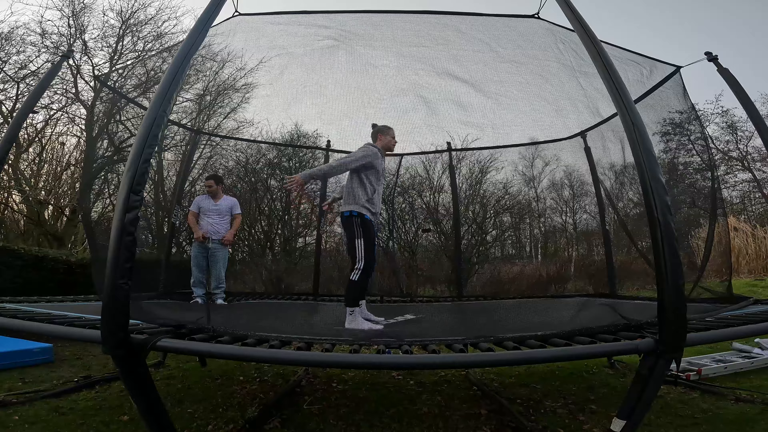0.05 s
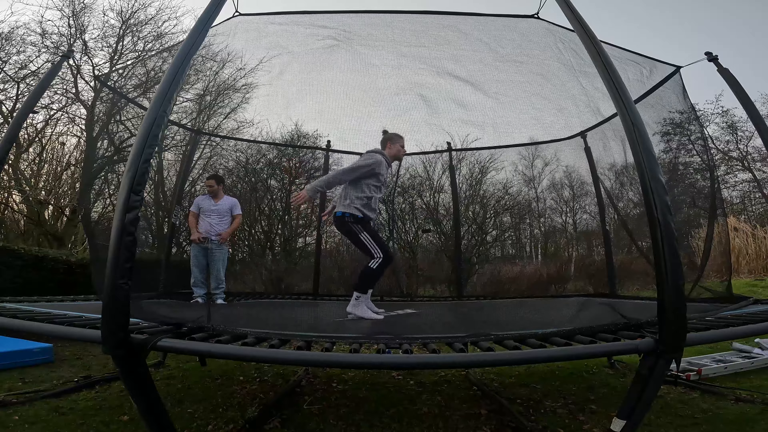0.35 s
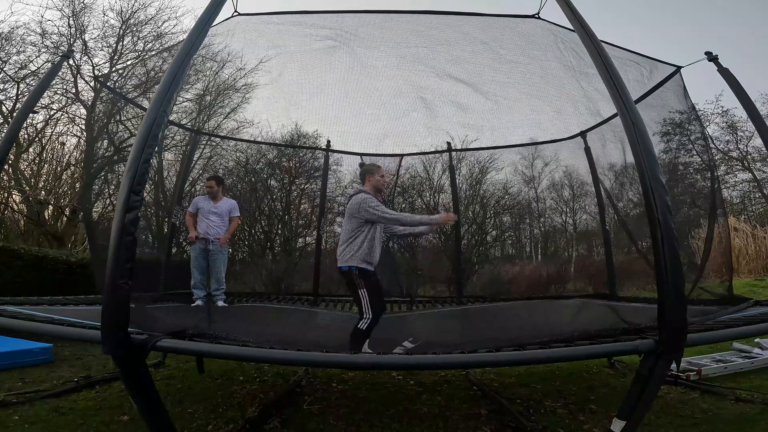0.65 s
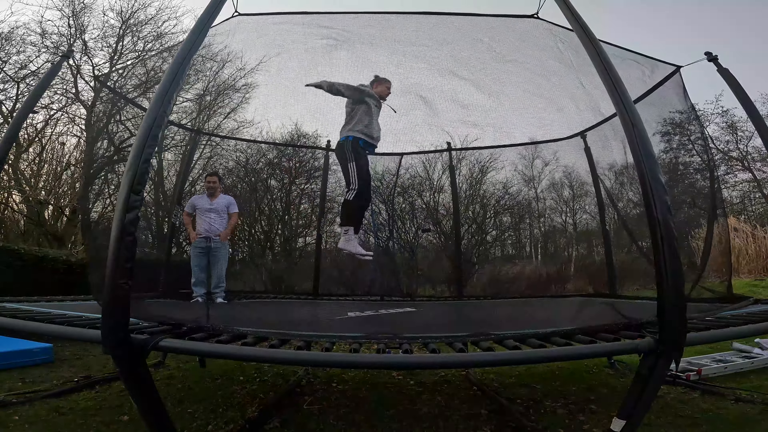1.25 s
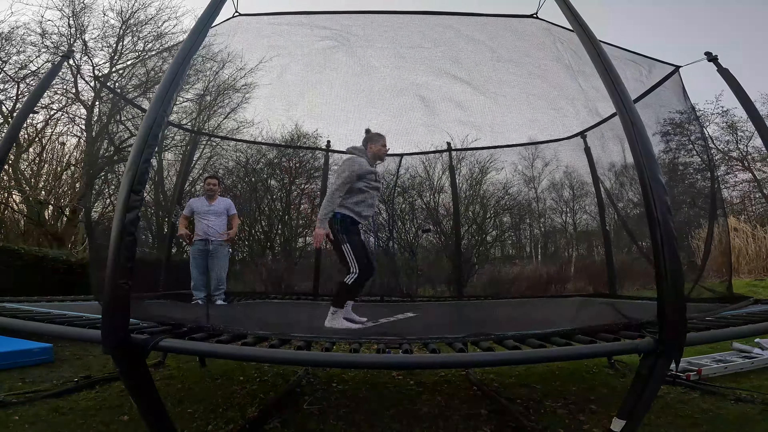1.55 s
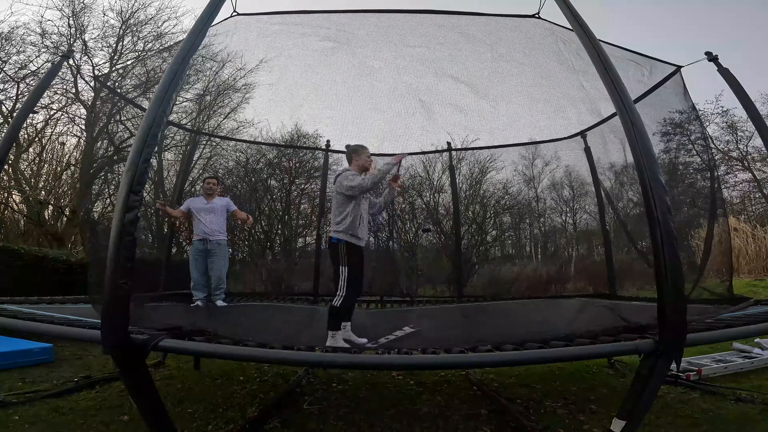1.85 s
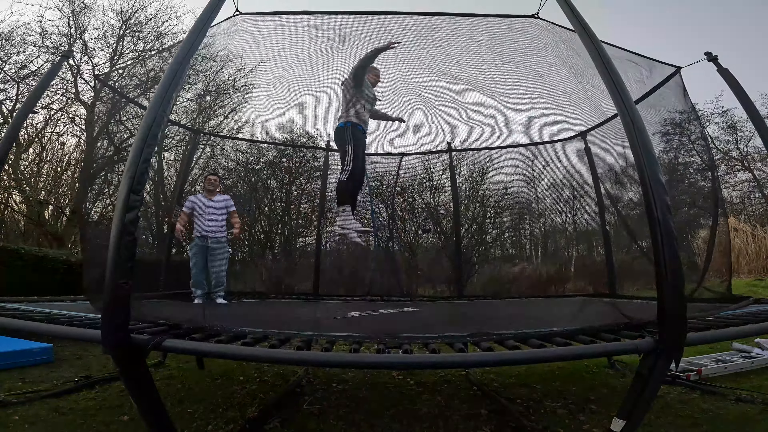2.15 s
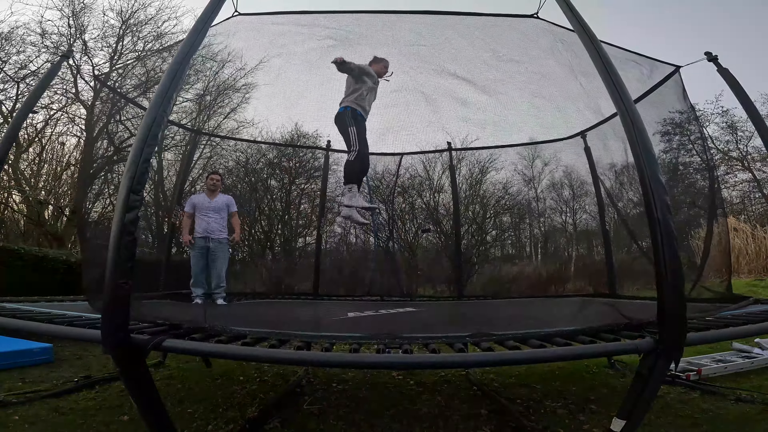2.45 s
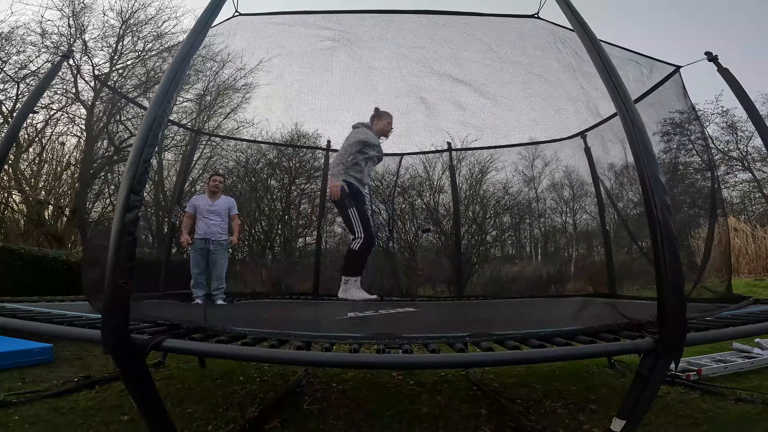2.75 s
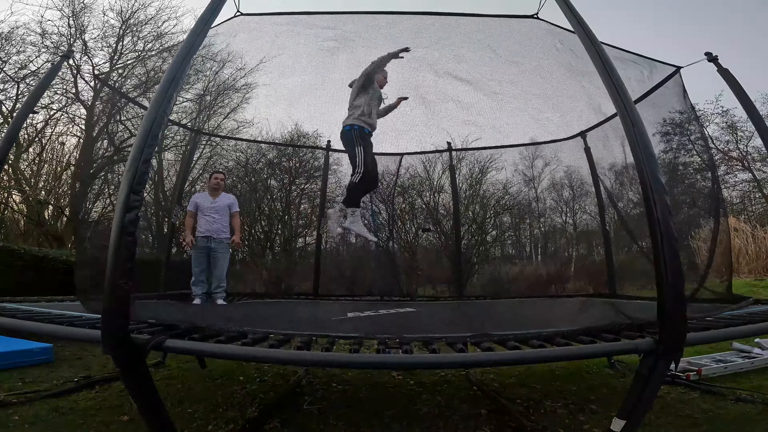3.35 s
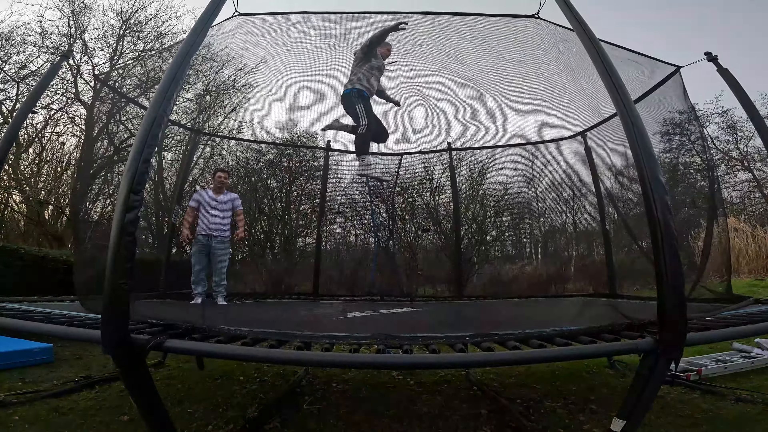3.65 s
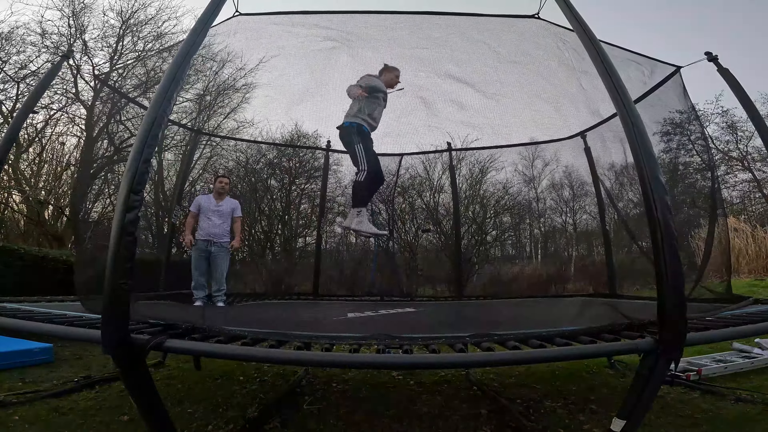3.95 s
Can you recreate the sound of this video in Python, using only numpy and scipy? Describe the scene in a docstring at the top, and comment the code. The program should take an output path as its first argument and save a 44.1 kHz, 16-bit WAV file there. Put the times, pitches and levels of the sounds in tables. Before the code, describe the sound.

Someone bounces three times on a garden trampoline close by. The mat rustles and hooks creak, then the springs rattle and clack against the ringing steel frame. The last two bounces begin with low thumps, over light wind.

```python
"""Light wind, a far outdoor hum and a faintly singing coil; then someone bounces three times on a
garden trampoline, close by. The mat rustles and the hooks creak as it stretches, the slack springs
rattle as it comes back up, and the empty mat snaps them against the ringing steel frame.
The second and third bounces each open with a landing that pushes out a thump of air."""
import sys
import numpy as np
from scipy import signal
from scipy.fft import rfft, irfft
from scipy.io import wavfile
from scipy.ndimage import uniform_filter1d

SR = 44100
rng = np.random.default_rng(int(sys.argv[2]) if len(sys.argv) > 2 else 0)


def dump_mix(stems):
    """Bounce the given channels to the path in sys.argv[1] as a 16-bit WAV at rate SR."""
    frames = np.atleast_2d(stems).T  # one column per channel
    limited = np.clip(frames, -1, 1)  # hard clip at full scale
    pcm = np.round(limited * 32767).astype(np.int16)
    wavfile.write(sys.argv[1], SR, pcm)


N = 176400
T = np.arange(N) / SR
RING_T = T[:SR]

# left-right likeness of noise: freq_hz, correlation
STEREO_CORRELATION = [(30, 0.98), (130, 1), (280, 0.79), (1000, 0.8), (4000, 0.76), (8000, 0.92),
                      (13000, 0.52)]
# wind and far hum: freq_hz, level_db
AIR_SPECTRUM = [(20, 5), (43, 2.5), (75, -9.5), (118, -18), (169, -15), (256, -26.5), (330, -30.5),
                (385, -22.5), (484, -28), (650, -30), (1000, -27), (1350, -24), (1800, -32.5), (2400, -48),
                (4000, -53.5), (7000, -56), (9500, -56), (15000, -71.5)]
# wind and far hum: time_s, level_db
AIR_LEVEL = [(0, -46), (1.5, -46), (2.6, -47.5), (4, -48.5)]
# low flutter of mat and wind: freq_hz, level_db
FLUTTER_SPECTRUM = [(40, 6), (70, -0.5), (110, -2.5), (160, -4), (230, -9.5), (320, -21.5), (600, -26),
                    (2000, -70)]
# low flutter of mat and wind: time_s, level_db
FLUTTER_LEVEL = [(0, -65), (.3, -52.5), (.5, -56), (.95, -61), (1.05, -42.5), (1.2, -91), (1.6, -66),
                 (1.75, -66), (1.9, -42), (2.04, -47), (2.12, -45.5), (2.22, -51), (2.5, -66), (2.9, -68),
                 (3.0, -49), (3.17, -39.5), (3.28, -45), (3.37, -44.5), (3.5, -54), (3.7, -58), (4, -72)]
# single coils singing: start_s, hold_s, pitch_hz, level_db
COIL_NOTES = [(0.01, 0.084, 787, -60), (1.305, 0.046, 2058, -64), (1.425, 0.066, 3100, -77)]

# friction of stretching mat and springs: time_s, level_db
HISS_LEVEL = [(0, -73), (.45, -76.5), (.6, -67), (.67, -57.5), (.8, -61), (.86, -61.5), (.95, -66.5),
              (1.3, -72), (1.66, -78), (1.74, -66), (1.93, -66), (1.98, -58.5), (2.06, -61), (2.4, -72.5),
              (2.9, -81.5), (2.95, -70.5), (3.05, -62), (3.11, -51), (3.128, -49.5), (3.17, -51),
              (3.23, -52), (3.32, -55), (3.5, -63.5), (4, -79)]
# friction grain: freq_hz, level_db
HISS_SPECTRUM = [(1200, -1.5), (2200, 2.5), (3800, -6), (5000, -2.5), (6000, -3.5), (7500, -6.5),
                 (9000, -16), (12000, -13.5), (13200, -24), (15000, -45)]
# taut coil slides in its hook: start_s, level_db
SWISHES = [(1.965, -61), (3.128, -44.5)]
# sliding coil: freq_hz, level_db
SWISH_SPECTRUM = [(3000, -18), (4400, -13), (5200, 1.5), (6100, -4.5), (7000, -10), (8000, -14.5),
                  (11000, -24), (15000, -50)]

# hooks and straps under load: start_s, hold_s, level_db, treble_db
CREAKS = [(.685, 0.0067, -53, 9), (.70, 0.017, -58.5, -19), (.85, 0.0034, -64, 14),
          (1.785, 0.0079, -54.5, -9), (1.821, 0.017, -47.5, -13), (1.862, 0.031, -54.5, -4),
          (1.934, .003, -49.5, -8), (1.958, 0.0068, -53.5, 1), (1.986, 0.0024, -47, -6),
          (3.119, 0.015, -56.5, 9), (3.134, 0.02, -47.5, -20), (3.2, 0.0052, -45.5, -6),
          (3.245, 0.0063, -42, 7.5), (3.288, 0.0088, -63, -5), (3.335, 0.013, -47, -12)]
# creaks and foot scuffs: freq_hz, level_db
RUB_SPECTRUM = [(250, -2), (500, -2), (750, -14.5), (1050, 4), (2200, -3), (4000, -13), (7500, -19),
                (9000, -20.5), (12000, -25.5), (15000, -58)]
# hook slips in its eye: start_s, level_db
PINGS = [(1.986, -57.5), (3.0703, -38.5), (3.122, -46.5)]
# slip noise: freq_hz, level_db
SLIP_SPECTRUM = [(1000, -22.5), (2000, -6), (2600, -6.5), (3400, -12), (5300, -16), (5700, -2.5),
                 (7000, -5.5), (7800, -17), (9800, -24), (11200, -18), (13000, -28), (15000, -46)]
# ringing hook: freq_hz, level_db, t60_s
HOOK_MODES = [(2514, -14, .16), (2697, -9, .12), (5674, 0, .09), (5900, -2, .09), (6385, -6, .1),
              (10980, -21, .11), (11500, -22, .1), (12910, -25, .1)]

# springs go slack: start_s, hold_s, level_db, treble_db
RATTLES = [(.737, .03, -41.5, -2), (.945, 0.072, -50.5, -47), (1.018, 0.058, -39, -6),
           (2.022, 0.031, -40.5, -31), (2.091, 0.053, -37, -4), (3.362, 0.019, -38, 2),
           (3.388, 0.023, -37, -10)]
# springs snap tight: start_s, level_db, treble_db
CLACKS = [(1.181, -37, 6), (2.26, -36, 5.5), (2.3293, -37, 7.5), (2.728, -61.5, 4), (3.501, -36.5, 6),
          (3.555, -48.5, -3), (3.584, -36, 6.5), (3.727, -53.5, -17)]
# dry steel contact: freq_hz, level_db
CONTACT_SPECTRUM = [(200, -24), (420, -2), (700, -7), (1100, -2), (2200, 6), (3200, -5), (3600, -4.5),
                    (4300, -7), (6000, -7.5), (7800, -9.5), (8500, -20.5), (12000, -25), (13200, -45),
                    (15000, -76)]
# frame and spring resonances: freq_hz, bandwidth_hz, level_db
FRAME_MODES = [(640, 40, -7), (788, 24, -3), (965, 30, 3), (1040, 40, -4), (1260, 28, 1), (1345, 40, -3),
               (1445, 40, -4), (1589, 40, -2), (1822, 40, -2), (1900, 36, 4), (2102, 26, 0), (2230, 24, 3),
               (2348, 26, 1), (2488, 40, -2), (2710, 40, -4), (2797, 30, -4), (2915, 28, 3), (3189, 18, 3),
               (3755, 55, -7), (4016, 35, -8), (4460, 40, -14), (4730, 70, -13), (5260, 110, -14),
               (5980, 100, -9), (6400, 90, -15), (6950, 70, -14), (7850, 110, -13)]
# dense ring of the coils: freq_hz, level_db
COIL_SPECTRUM = [(700, 1.5), (1300, -1), (2200, 4.5), (3200, 1.5), (3500, -11), (4600, -13.5), (5600, -2),
                 (7400, -8), (8500, -29), (12000, -23.5), (15000, -60)]
# long single coil modes: freq_hz, level_db, t60_s
COIL_MODES = [(788, -7, .8), (1335, -7, .4), (2090, -6, .45), (2347, -2, .25), (2895, -4, .36),
              (2922, -4, .36), (3172, -5, .36), (3193, -3, .38), (4020, -9, .17)]
# flapping mat edge: freq_hz, level_db
EDGE_SPECTRUM = [(150, -2.5), (330, -17.5), (480, -5.5), (650, -6), (980, 5), (1400, 1), (2000, -3.5),
                 (3500, -24), (8000, -49)]

# mat swings through level: centre_s, level_db, width_s
SWINGS = [(1.05, -31.5, .011), (1.745, -32.5, .005), (2.12, -27.5, 0.0099), (3.002, -28, 0.0077),
          (3.364, -23, 0.0085)]
# feet first touch the mat: start_s, level_db
SCUFFS = [(1.678, -52.5), (2.93, -50.5)]
# feet land: centre_s, level_db, pulse_width_s, slap_db
LANDINGS = [(1.687, -14.5, 0.002, -45), (2.9407, -12, 0.0038, -40)]
# boom of the struck mat: freq_hz, level_db, t60_s
MAT_MODES = [(53, -20, 0.21), (132.6, -10.5, .045), (225.7, -18, 0.081)]
# slap of the feet: freq_hz, level_db
SLAP_SPECTRUM = [(100, -5), (230, 2), (330, -4), (480, -1), (750, -16), (1300, -8.5), (2500, -32),
                 (7000, -42), (14000, -57)]
# shudder after a landing: freq_hz, level_db
SHUDDER_SPECTRUM = [(20, 13.5), (55, 3.5), (90, -10), (135, -10), (190, -12.5), (300, -59), (900, -80)]

TREBLE_HZ, TREBLE_PAN_DB, MODE_SPREAD_RAD = 3430, 1.05, 0.2
GRAINS_PER_S, GRAIN_T60_S = 4300, 0.02
HOOK_RING_DB = -1.5
TAKE_UP_S, TAKE_UP_DB, TAKE_UP_TREBLE_DB = 0.0088, -11.5, -4
CONTACT_DB, FRAME_DB, EDGE_DB = -4.5, -4, -10
COILS_DB, COIL_MODES_DB, SLACK_RING_DB = -10, -17, -0.5
SUCTION_SHARE, SUCTION_WIDTH_S, SUCTION_LAG_S = 0.27, 0.0099, 0.019
BOOM_RISE_S, SLAP_LEAD_S, SHUDDER_DB = 0.0057, 0.01, -15
START_S, FADE_IN_S, STOPBAND_HZ = 0.0323, 0.003, 15800


def from_db(db):
    """Decibels to gain."""
    return 10 ** (np.asarray(db) / 20)


def unit_rms(x):
    """Scale to rms 1."""
    return x / np.sqrt(np.mean(x ** 2) + 1e-20)


def unit_energy(x):
    """Scale a stereo response to mean energy 1 per side."""
    return x / np.sqrt(np.sum(x ** 2) / 2 + 1e-20)


def at_hz(points, hz):
    """Interpolate on a log-frequency axis."""
    freq_hz, value = np.transpose(points)
    return np.interp(np.log(hz + 1), np.log(freq_hz), value)


def gain_curve(points):
    """Gain per sample from rows of time_s, level_db."""
    return from_db(np.interp(T, *np.transpose(points)))


def envelope(start_s, rise_s, hold_s, fall_s):
    """Exponential rise up to start_s, hold, exponential fall."""
    rising = np.minimum(T - start_s, 0) / rise_s
    falling = np.maximum(T - start_s - hold_s, 0) / fall_s
    return np.exp(np.maximum(rising - falling, -40))


def noise(spectrum, size=N):
    """Coloured stereo noise, most alike left and right in the bass; rms 1."""
    hz = np.fft.rfftfreq(size, 1 / SR)
    alike = at_hz(STEREO_CORRELATION, hz)
    mid, side = np.exp(2j * np.pi * rng.random((2, len(hz))))
    bins = np.sqrt(1 + alike) * mid + np.sqrt(1 - alike) * side * [[1], [-1]]
    return unit_rms(irfft(bins * from_db(at_hz(spectrum, hz)) * (hz > 10), size))


def dense_ring(spectrum, t60_s):
    """Response of many close modes dying together, evened out to follow the spectrum."""
    target = from_db(at_hz(spectrum, np.fft.rfftfreq(SR, 1 / SR)))
    tail_fade = np.exp(-(RING_T / t60_s) ** 4)
    ring = noise(spectrum, size=SR) * from_db(-60 * RING_T / t60_s)
    for _ in range(3):
        bins = rfft(ring)
        excess = uniform_filter1d(np.mean(np.abs(bins) ** 2, axis=0) / target ** 2, size=120)
        ring = irfft(bins / np.sqrt(np.abs(excess) + 1e-12), SR) * tail_fade
    return unit_energy(ring)


def mode_ring(modes):
    """Damped sines of alternating sign, slightly out of phase left and right."""
    lean_rad = MODE_SPREAD_RAD * rng.choice([-1, 1], len(modes))
    ring = 0
    for k, (hz, db, t60_s) in enumerate(modes):
        phase_rad = 2 * np.pi * hz * RING_T + lean_rad[k] * np.array([[1], [-1]])
        ring += (-1) ** k * from_db(db - 60 * RING_T / t60_s) * np.sin(phase_rad)
    return unit_energy(ring)


def excite(force, response):
    """Convolve a force with a stereo response."""
    return signal.fftconvolve(force[None], response, axes=1)[:, :N]


def clicks(rate_per_s):
    """Random tiny contacts, levelled over 7 ms."""
    hits = (rng.random(N) < rate_per_s / SR) * rng.standard_normal(N)
    return hits / np.sqrt(np.abs(uniform_filter1d(hits * hits, size=310)) + 1e-5)


def bursts(rows, rise_s, fall_s, rate_per_s):
    """Click bursts from rows of start_s, hold_s, level_db, treble_db."""
    hits = clicks(rate_per_s)
    low = signal.sosfilt(signal.butter(2, TREBLE_HZ, fs=SR, output="sos"), hits[::-1])
    low = signal.sosfilt(signal.butter(2, TREBLE_HZ, fs=SR, output="sos"), low[::-1])  # zero phase
    force = 0
    for start_s, hold_s, db, treble_db in rows:
        shelved = low + from_db(treble_db) * (hits - low)
        force += from_db(db) * envelope(start_s, rise_s, hold_s, fall_s) * shelved
    return force


def wind_and_hum():
    """Light wind and far hum: near-steady noise."""
    return gain_curve(AIR_LEVEL) * noise(AIR_SPECTRUM)


def flutter():
    """Mat and wind flutter: low noise swelling with each bounce."""
    return gain_curve(FLUTTER_LEVEL) * noise(FLUTTER_SPECTRUM)


def singing_coils():
    """Single coils swell and fade, each a narrow noise band of wavering pitch."""
    notes = 0
    for start_s, hold_s, hz, db in COIL_NOTES:
        band = signal.butter(2, [0.965 * hz, 1.035 * hz], "band", fs=SR, output="sos")
        tone = unit_rms(signal.sosfilt(band, rng.standard_normal(N)))
        notes += from_db(db) * envelope(start_s, 0.015, hold_s, fall_s=0.066) * tone
    return notes


def stretching():
    """Friction grains hiss as the mat stretches; a taut coil swishes in its hook."""
    friction = gain_curve(HISS_LEVEL) * clicks(GRAINS_PER_S)
    hiss = excite(friction, dense_ring(HISS_SPECTRUM, GRAIN_T60_S))
    slide = sum(from_db(db) * envelope(start_s, 0.0073, 0.016, fall_s=0.057) for start_s, db in SWISHES)
    return hiss + excite(slide * clicks(GRAINS_PER_S), dense_ring(SWISH_SPECTRUM, GRAIN_T60_S))


def hooks():
    """Runs of slips under load creak; a single slip pings and rings on."""
    stick_slip = bursts(CREAKS, rise_s=0.0032, fall_s=0.011, rate_per_s=1100)
    creaks = excite(stick_slip, dense_ring(RUB_SPECTRUM, t60_s=0.012))
    ring = mode_ring(HOOK_MODES)
    slips, strikes = np.zeros((2, N))
    for start_s, db in PINGS:
        slips += from_db(db) * envelope(start_s, 0.00027, 0.0011, fall_s=0.017)
        strikes[int(start_s * SR)] = from_db(db + HOOK_RING_DB)
    return creaks + slips * noise(SLIP_SPECTRUM) + excite(strikes, 2 * ring / np.abs(ring).max())


def springs():
    """Rattles and clacks ring frame and coils; rattles ring the coils less and flap the mat's edge."""
    rattles = bursts(RATTLES, rise_s=0.0096, fall_s=0.01, rate_per_s=2200)
    snaps = [(start_s, 0.0023, db, treble_db) for start_s, db, treble_db in CLACKS]
    take_ups = [(snap_s - TAKE_UP_S, TAKE_UP_S, db + TAKE_UP_DB, TAKE_UP_TREBLE_DB)
                for snap_s, db, _ in CLACKS]
    clacks = bursts(snaps + take_ups, rise_s=0.0018, fall_s=0.011, rate_per_s=4500)
    modes = [(hz, db + 20 * np.log10(width_hz), np.log(1000) / (np.pi * width_hz))
             for hz, width_hz, db in FRAME_MODES]
    frame = from_db(FRAME_DB) * mode_ring(modes)
    contact = from_db(CONTACT_DB) * dense_ring(CONTACT_SPECTRUM, t60_s=0.007)
    coils = from_db(COILS_DB) * dense_ring(COIL_SPECTRUM, t60_s=0.41)
    coils += from_db(COIL_MODES_DB) * mode_ring(COIL_MODES)
    flapping = from_db(EDGE_DB) * excite(rattles, dense_ring(EDGE_SPECTRUM, t60_s=0.036))
    clatter = excite(rattles + clacks, contact + frame)
    ringing = excite(from_db(SLACK_RING_DB) * rattles + clacks, coils)
    return flapping + clatter + ringing


def mat_swings():
    """The mat fans air as it swings through level: one push, one pull."""
    air = 0
    for centre_s, db, width_s in SWINGS:
        offset = (T - centre_s) / width_s
        air -= from_db(db) * offset * np.exp(0.5 - 0.5 * offset ** 2)
    return air


def landings():
    """Feet scuff and slap the mat; it pushes out air, sucks it back, booms and shudders."""
    thump, slap, shudder = np.zeros((3, N))
    for land_s, db, width_s, slap_db in LANDINGS:
        age_s = T - land_s
        push = np.exp(-0.5 * (age_s / width_s) ** 2)
        suction = np.exp(-0.5 * ((age_s - SUCTION_LAG_S) / SUCTION_WIDTH_S) ** 2)
        thump += from_db(db) * (push - SUCTION_SHARE * suction)
        for hz, mode_db, t60_s in MAT_MODES:
            boom = envelope(land_s, BOOM_RISE_S, 0, fall_s=t60_s / np.log(1000))
            thump += from_db(db + mode_db) * boom * np.cos(2 * np.pi * hz * age_s)
        slap += from_db(slap_db) * envelope(land_s - SLAP_LEAD_S, 0.001, SLAP_LEAD_S, fall_s=0.028)
        shudder += from_db(db + SHUDDER_DB) * envelope(land_s, 0.0011, 0, fall_s=0.084)
    scuff = sum(from_db(db) * envelope(start_s, 0.00027, 0, fall_s=0.013) for start_s, db in SCUFFS)
    feet = scuff * noise(RUB_SPECTRUM) + slap * noise(SLAP_SPECTRUM)
    return thump + feet + shudder * noise(SHUDDER_SPECTRUM)


def scene():
    """Trampoline over wind and hum; the steel's treble leans left."""
    steel = springs() + singing_coils() + hooks() + stretching()
    treble = signal.sosfiltfilt(signal.butter(1, TREBLE_HZ, "high", fs=SR, output="sos"), steel)
    steel += treble * (from_db([[TREBLE_PAN_DB], [-TREBLE_PAN_DB]]) - 1)
    return steel + landings() + mat_swings() + flutter() + wind_and_hum()


def record(dry):
    """Quick fade-in, steep low-pass."""
    fade_in = np.clip((T - START_S) / FADE_IN_S, 0, 1)
    return signal.sosfilt(signal.cheby2(12, 60, STOPBAND_HZ, fs=SR, output="sos"), dry * fade_in)


dry = scene()
out = record(dry)
dump_mix(out)
```